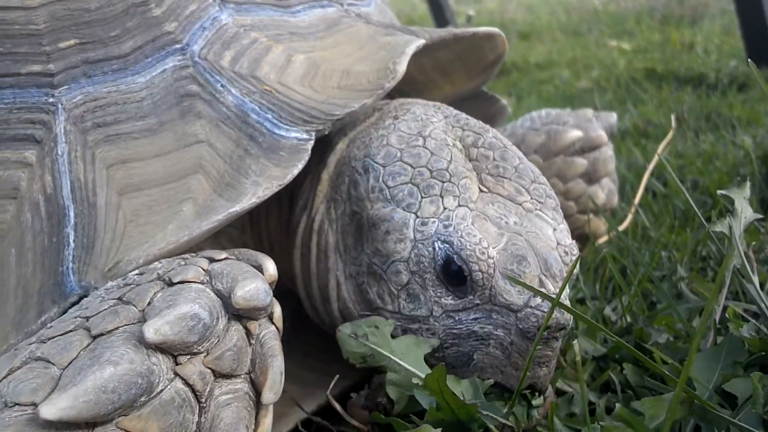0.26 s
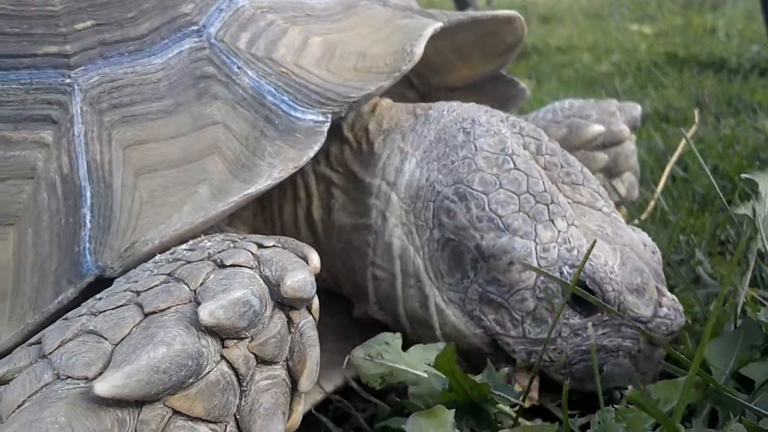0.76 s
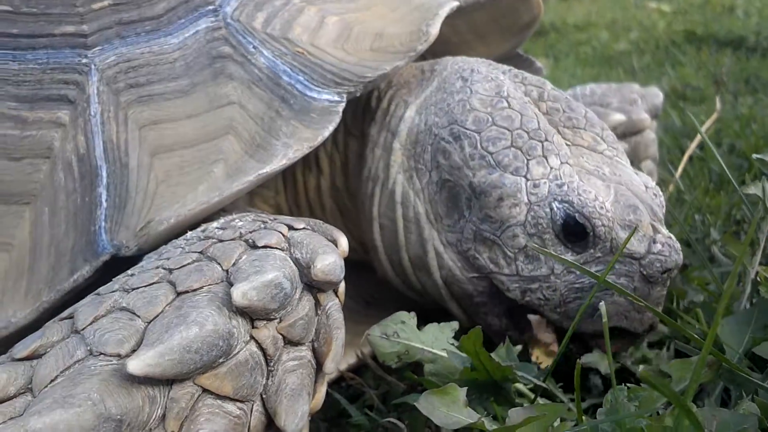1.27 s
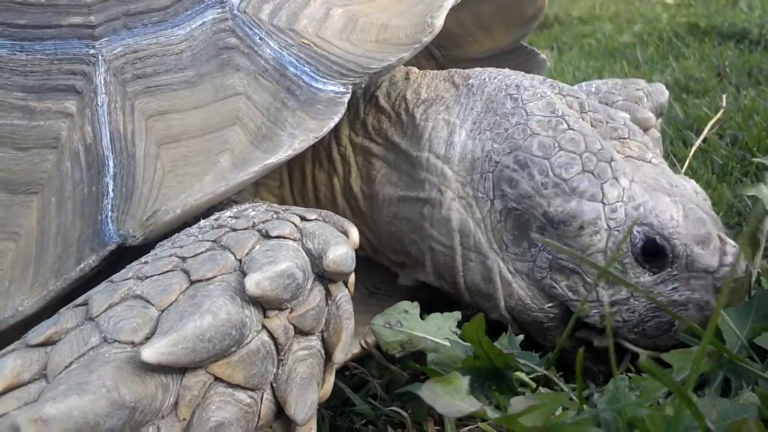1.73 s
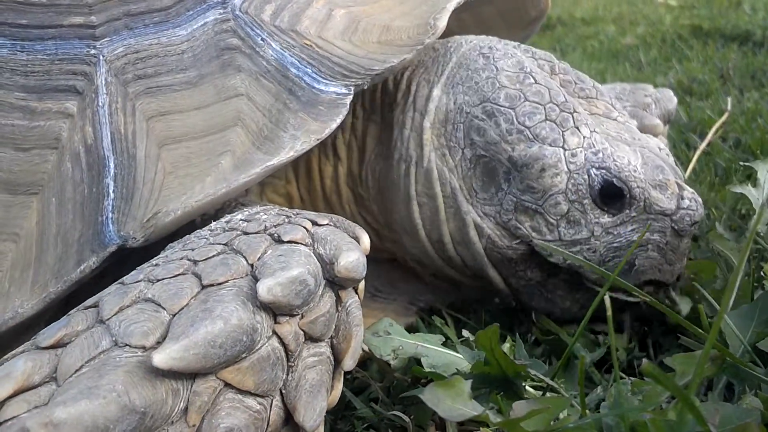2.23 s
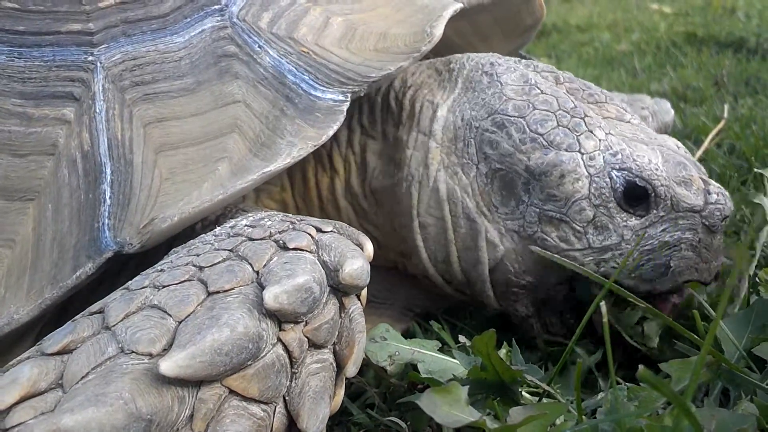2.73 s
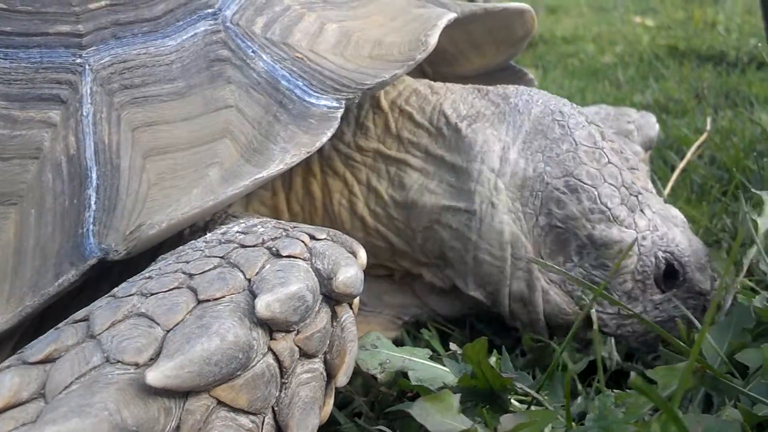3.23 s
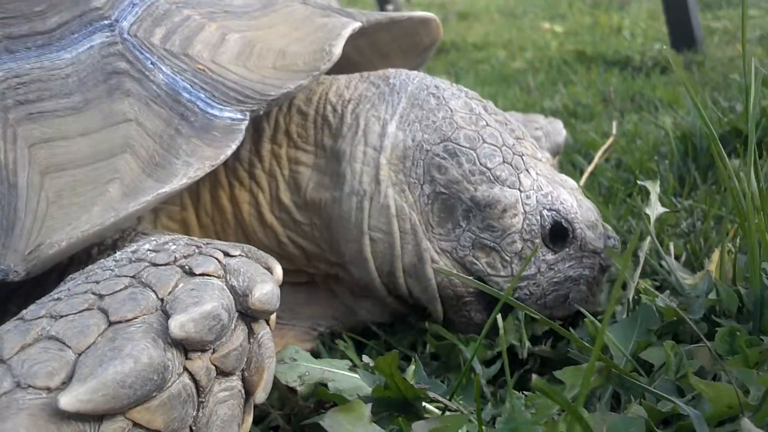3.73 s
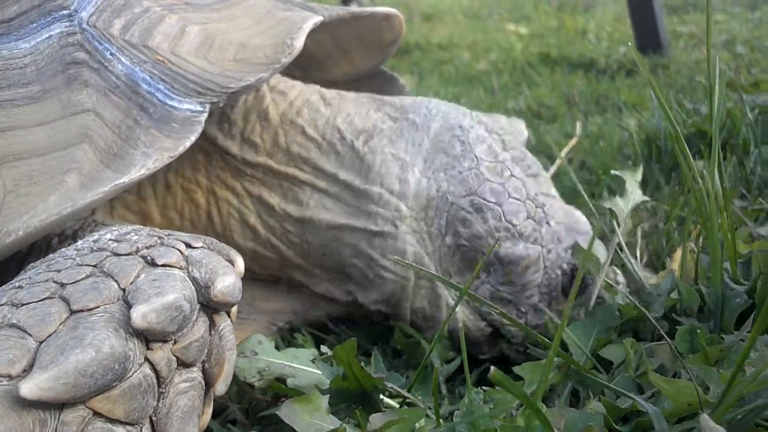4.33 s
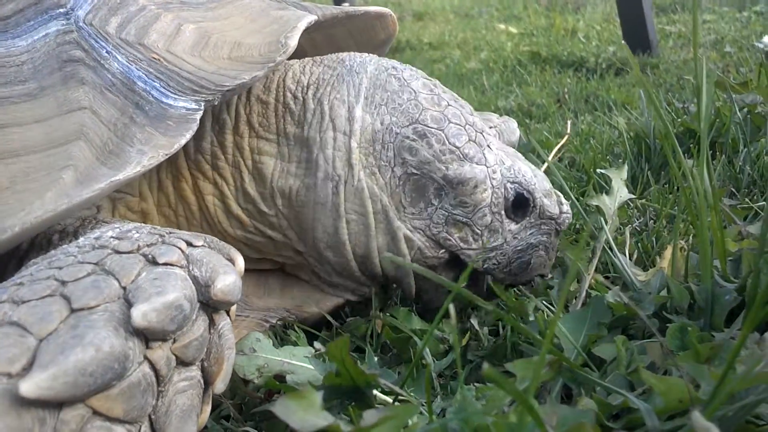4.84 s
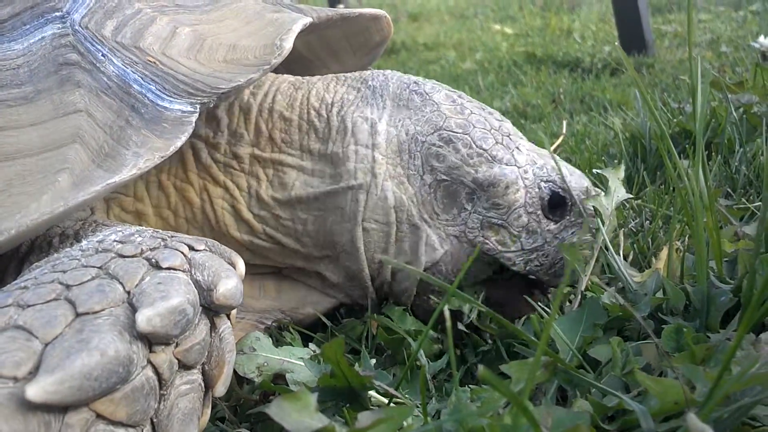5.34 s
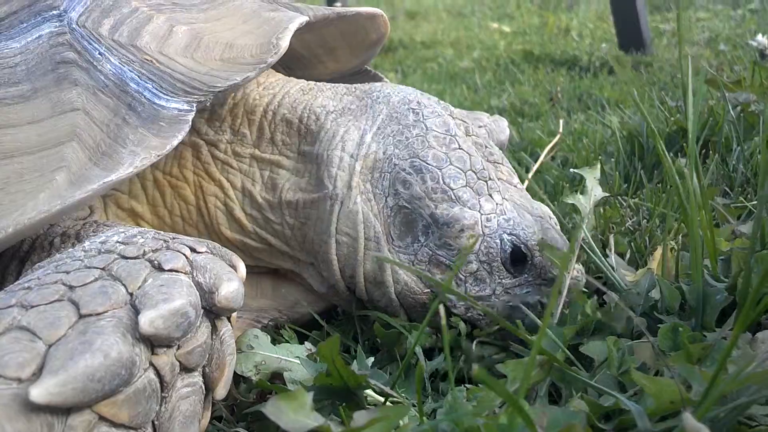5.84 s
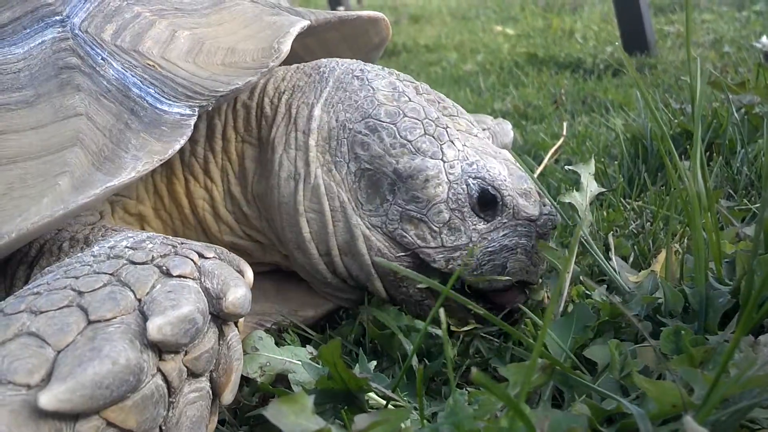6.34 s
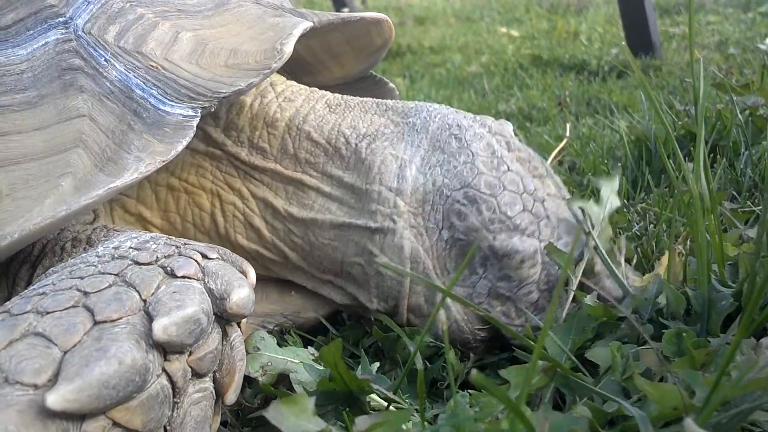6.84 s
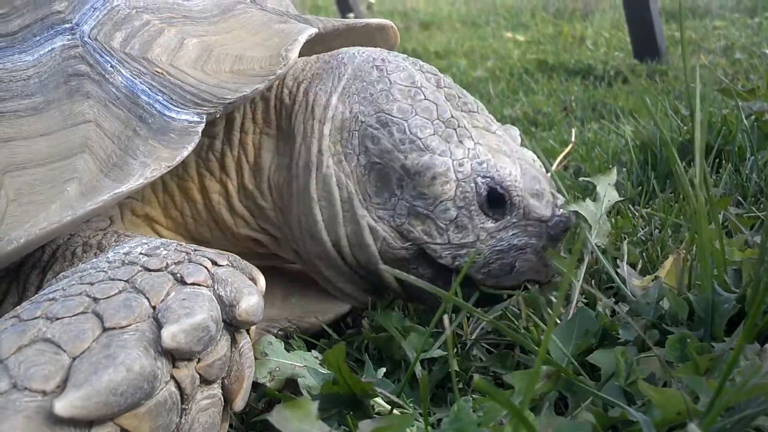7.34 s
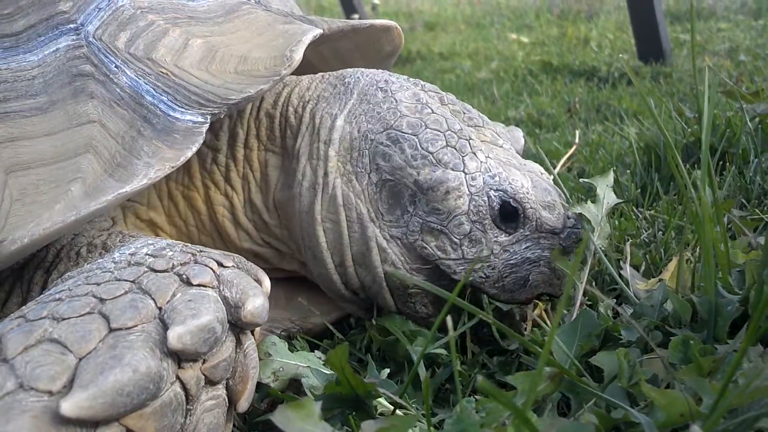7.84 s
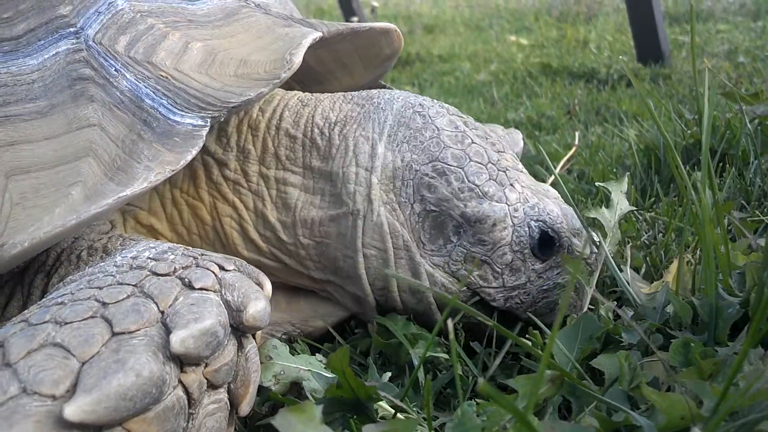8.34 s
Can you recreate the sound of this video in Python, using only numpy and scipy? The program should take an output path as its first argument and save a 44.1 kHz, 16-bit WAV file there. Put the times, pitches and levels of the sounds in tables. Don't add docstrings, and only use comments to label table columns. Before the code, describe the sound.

Close on a lawn, a tortoise bites leafy weeds: small bumps and rustles first, then bursts of sharp snaps, ticking veins and tearing leaves with quiet gaps between. Some gardens away a dog gives short, hoarse, high yelps that slap back off house walls. Far traffic drones softly underneath with faint hiss. A small stereo camera microphone sits beside the animal, the bites slightly right.

```python
import sys
import numpy as np
from scipy import signal
from scipy.fft import rfft, irfft, next_fast_len
from scipy.io import wavfile
from scipy.ndimage import uniform_filter1d, map_coordinates

SR = 44100
rng = np.random.default_rng(int(sys.argv[2]) if len(sys.argv) > 2 else 0)


def voltage_ratio(decibels):
    exponent = np.asarray(decibels, float) / 20
    return 10 ** exponent


def to_wav(sig):
    pcm = np.clip(np.atleast_2d(sig), -1, 1) * 32767
    pcm = np.round(pcm).astype(np.int16)
    wavfile.write(sys.argv[1], SR, pcm.T)


N = 378963


def unit(x):
    return x / np.sqrt(np.mean(x ** 2) + 1e-20)


def along(points, hz):
    f, v = np.transpose(points)
    return np.interp(np.log(hz + 1), np.log(f + 1), v)


def curves(rows):
    s, *cols = np.transpose(rows)
    return [np.interp(np.arange(N) / SR, s, c) for c in cols]


def wobble(rate, count=N):
    knots = rng.standard_normal(int(count * rate / SR) + 4)
    return map_coordinates(knots, [np.arange(count) * rate / SR])


def filtered(x, response):
    m = next_fast_len(N + 8192)
    return irfft(rfft(x, m) * response(np.fft.rfftfreq(m, 1 / SR)), m)[..., :N]


def band(x, low_hz, high_hz):
    sos = signal.butter(2, [low_hz, min(high_hz, SR / 2.2)], "band", fs=SR, output="sos")
    return signal.sosfilt(sos, x)


def delayed(hz, delay_s):
    return np.exp(-2j * np.pi * hz * delay_s)


def rush(spectrum, alike):
    pair = rng.standard_normal((2, N))

    def response(hz):
        turn = np.arccos(np.clip(along(alike, hz), -1, 1)) / 2
        return voltage_ratio(along(spectrum, hz)) * [np.cos(turn), np.sin(turn)]

    mid, side = filtered(pair, response)
    return unit(np.array([mid + side, mid - side]))


def patchy(x, depth_db):
    z = signal.stft(x, nperseg=2048)[2]
    field = uniform_filter1d(rng.standard_normal(z.shape[1:]), size=4, axis=0)
    field = uniform_filter1d(field, size=4, axis=1)
    return unit(signal.istft(z * voltage_ratio(depth_db * unit(field)), nperseg=2048)[1][:, :N])


# hz, level_db (per Hz)
RUMBLE = [(25, -45), (45, -15.5), (70, -9), (120, 2), (220, 0), (400, -8), (800, -44.5)]
DRONE = [(100, -52), (250, -13), (500, 5), (900, -0.5), (1300, -10), (2000, -16), (3000, -17), (5000, -82),
         (9000, -122)]
HISS = [(1500, -20), (3000, -2), (6000, -3), (10000, 0), (13000, 0.5), (15500, 1)]
# hz, likeness (0-1)
TOWN_ALIKE = [(60, 0.89), (200, 0.91), (600, 0.62), (1500, 0.0074), (4000, 0.011)]
# start_s, rumble_db, drone_db
TRAFFIC = [
    (0, -48, 2.1),
    (1.5, -51.5, -2),
    (4, -50, 0.35),
    (5.35, -52, 1.5),
    (6.5, -52.5, 1.9),
    (7.55, -52, -0.2),
    (7.9, -51, -0.5),
    (8.07, -47.5, 1),
    (8.2, -46, 2.5),
    (8.59, -49, -1.3),
]
# start_s, depth_db
DUCKS = [
    (2.0, 0.5),
    (3.37, 4.5),
    (4.52, 3),
    (5.93, 0.5),
    (7.2, 9.5),
]


def town():
    t = np.arange(N) / SR
    drop_s, recover_s = 0.012, 0.62
    gain_db = 0
    for s, depth_db in DUCKS:
        since = np.maximum(t - s, 0)
        gain_db = gain_db - depth_db * (1 - np.exp(-since / drop_s)) * np.exp(-since / recover_s)
    rumble_db, swell_db = curves(TRAFFIC)
    rumble = voltage_ratio(rumble_db + 8.5 + 0.5 * wobble(3.7)) * patchy(rush(RUMBLE, TOWN_ALIKE), depth_db=1)
    drone = voltage_ratio(swell_db - 45.5 + 1.1 * wobble(5)) * patchy(rush(DRONE, TOWN_ALIKE), depth_db=1.8)
    hiss = voltage_ratio(-56) * rush(HISS, [(1000, 0.017)])
    return voltage_ratio(gain_db) * (rumble + drone + hiss)


# delay_s, level_db
WALLS = [
    (.168, -5),
    (.205, -10.5),
    (.24, -27),
    (.29, -17),
]
# hz, level_db
WALL_TONE = [(300, -45), (600, -9), (1000, -8), (1300, -7), (1500, 6), (1750, 5.5), (3000, -1)]


def far_wall(x):
    def response(hz):
        slaps = sum(voltage_ratio(db) * delayed(hz, s) for s, db in WALLS)
        return voltage_ratio(along(WALL_TONE, hz)) * slaps

    return filtered(x, response)


def beside(x, left_db, lag_s):
    return np.array([voltage_ratio(left_db) * filtered(x, lambda hz: delayed(hz, lag_s)), x])


# hz, t60_s
YARD = [(300, 0.12), (1000, 0.51), (1600, 0.88), (4000, 0.32)]


def yard(x):
    hz, t, z = signal.stft(rng.standard_normal((2, SR)), SR, nperseg=256)
    tail = signal.istft(z * voltage_ratio(-60 * t / along(YARD, hz)[:, None]), SR, nperseg=256)[1]
    tail = tail + 0.3 * tail[::-1]
    late = np.pad(x, (700, 0))[None]
    return signal.fftconvolve(late, tail / np.linalg.norm(tail[0]), axes=1)[:, :N]


# start_s, length_s, pitch_hz (top), scoop (share below, 0-1), level_db
YELPS = [
    (0.923, .13, 550.5, 0.27, -36),
    (2.351, 0.14, 539, 0.24, -36.5),
    (3.822, 0.13, 532.7, 0.2, -33),
    (4.681, 0.12, 541.3, 0.19, -38),
    (5.553, 0.14, 525.7, 0.19, -29.5),
    (6.911, 0.092, 517, 0.15, -33.5),
    (7.372, 0.0945, 495, .1, -42.5),
    (7.624, 0.13, 527.6, 0.2, -30.5),
    (7.9, 0.079, 490, 0.18, -27),
    (8.254, 0.084, 478.5, .12, -25),
]
# breath_db, second_db, third_db, upper_db (fourth and above), doubling (0-1)
VOICES = [(-12.5, -2.5, -14.5, 3.5, 0.54), (-9, -7, -12.5, -16.5, 0.07), (-9, -4, -22, -2, 0.2),
          (-6, -4, -27, -5, 0), (-16, -18.5, -39, 3, 0.19), (-7, -3, -35, -22, 0.24),
          (-10, -4, -13, -21, 0.2), (-15, -10.5, -43, -35.5, 0.12), (-14, -16.5, -22, -34, 0),
          (-16.5, -9.5, -35, -40, 0.05)]
# yard_db, far_wall_db, left_over_right_db (direct sound)
AIMS = [(1.5, -13.5, 3.5), (1, -10.5, 6), (-3, -8, -9), (-4.5, 0, 4.5), (0.5, 1.5, 4.5), (-6, -12, 4),
        (-4, -19, -2.5), (-10.5, -15, -4), (-4.5, -10, -4.5), (-7.5, -13, -3.5)]
# peak_at (share of length), start_db, fall_db (after peak), top_partials_db (5th, 6th)
SWELLS = [(.4, -10, -7, -14), (.72, -5, -4, 12), (.3, -5, -3, -6), (.7, -5, -2, -6), (.3, -10, -5, -6),
          (.2, -6, -3, -6), (.45, -6, -3, -6), (.33, -7, -5, -6), (.36, -9, -5, -6), (.15, -5, -1, -6)]
# shake (share), glide_s (closing the scoop), sag (share lost at the end)
SHAKES = [(0.036, 0.032, 0.0495), (0.013, 0.016, 0.113), (0.025, .015, .08), (.02, 0.01435, 0.116),
          (0.029, 0.0157, 0.116), (0.028, 0.0106, 0.118), (0.018, 0.0089, .12), (0.014, 0.0137, 0.125),
          (0.021, 0.0236, 0.056), (0.018, 0.0191, 0.074)]
# hz, level_db (per Hz)
THROAT = [(300, 12), (500, 24), (700, -43), (880, 21.5), (1050, 13), (1250, -61), (1450, -71), (2100, 2.5),
          (3200, -23)]
# hz, level_db
MOUTH = [(760, 19.5), (880, 4.5), (960, 1), (1050, 0.5), (1150, -7)]
# partial (number), level_db
UPPER = [(5, 1), (6, -9)]


def dog():
    out = np.zeros((4, N))
    breath = unit(filtered(rng.standard_normal(N), lambda hz: voltage_ratio(along(THROAT, hz))))
    t = np.arange(N) / SR

    def rough(count):
        fast, slow = wobble(130, count=SR // 4), wobble(30, count=SR // 4)
        return voltage_ratio(2.8 * fast + .8 * slow)[:count]

    for yelp, voicing, aim, swell, movement in zip(YELPS, VOICES, AIMS, SWELLS, SHAKES):
        s, length, top_hz, scoop, db = yelp
        breath_db, second_db, third_db, upper_db, doubling = voicing
        yard_db, wall_db, left_db = aim
        peak_at, start_db, fall_db, top_partials_db = swell
        shake, glide, sag = movement

        gate = np.clip((t - s) / 0.008, 0, 1) * np.clip((s + length - t) / 0.004 + 1, 0, 1)
        on = gate > 0
        u = (t[on] - s) / length
        under = scoop * np.exp(-((t[on] - s) / glide) ** 2 / 2)
        pitch = top_hz * (1 - under - sag * u ** 4)
        level_db = db - 11.5 * under + np.interp(u, [0.6, 1], [0, -2])
        level_db += np.interp(u, [0, np.clip(peak_at, .05, .95), 1], [start_db, 0, fall_db])

        shaken = pitch * (1 + shake * wobble(120, count=SR // 4)[:len(u)])
        turn = 2 * np.pi * np.cumsum(shaken) / SR
        voice = rough(len(u)) * np.sin(turn)
        voice += voltage_ratio(second_db + along(MOUTH, 2 * pitch)) * rough(len(u)) * np.sin(2 * turn)
        top = sum(voltage_ratio(partial_db + top_partials_db) * np.sin(k * turn) for k, partial_db in UPPER)
        upper = np.sin(3 * turn) + voltage_ratio(upper_db) * (np.sin(4 * turn) + top)
        voice += voltage_ratio(third_db) * rough(len(u)) * upper
        voice += voltage_ratio(breath_db) * breath[on] * (1 + np.sin(turn))
        voice *= 1 + doubling * np.sin(turn / 2)
        out[:, on] += voltage_ratio([[0], [left_db], [yard_db], [wall_db]]) * voltage_ratio(level_db) * gate[on] * voice
    return band(out, low_hz=200, high_hz=9000)


# start_s, level_db (peak)
KNOCKS = [(0.008, -28.0), (0.041, -30.0), (0.056, -33.0), (0.068, -31.0), (0.082, -30.0), (0.097, -34.0),
          (0.119, -34.0), (0.197, -31.0), (0.23, -30.0), (0.423, -31.0), (0.543, -30.0), (0.555, -32.0),
          (0.566, -31.0), (0.616, -34.0), (0.631, -27.0), (0.724, -35.0), (0.736, -32.0), (0.752, -29.0),
          (0.832, -31.0), (0.893, -34.0), (1.083, -32.0), (1.112, -27.0), (3.01, -35.0), (3.075, -31.0),
          (3.093, -34.0), (3.21, -32.0), (3.33, -34.0), (3.783, -32.0), (6.133, -36.0), (6.341, -33.0)]


def knocks():
    t = np.arange(1500) / SR
    out = np.zeros(N + len(t))
    for s, db in KNOCKS:
        rock = np.sin(2 * np.pi * rng.uniform(150, 330) * t)
        rock += 1.2 * band(rng.standard_normal(len(t)), 200, 900)
        out[round(s * SR):][:len(t)] += voltage_ratio(db + 2 - 60 * t / .035) * (1 - np.exp(-t / .001)) * rock
    return band(out[:N], 90, 2500) * [[1], [-.75]]


def round_case(pair):
    def to_left(hz):
        long = 1 / (1 + (hz / 5600) ** 6)
        return voltage_ratio(-8) * long + voltage_ratio(-6) * (1 - long) * delayed(hz, .00047)

    return np.array([filtered(pair[0], to_left), pair[1]])


# peak_s, rise_s, fall_s, level_db (rise and fall span 20 dB)
DRAGS = [(.059, 0.083, 0.16, -44), (.225, 0.045, 0.044, -47), (.422, 0.11, 0.088, -43.5),
         (.631, 0.2, 0.34, -38), (.874, .3, 0.14, -49.5), (1.181, 0.71, 0.26, -50.5),
         (1.529, .07, 0.14, -46), (1.699, 0.093, 0.38, -42), (1.87, 0.12, 0.17, -38),
         (1.987, .1, 0.082, -42.5), (2.149, 0.097, 0.042, -50), (2.36, 0.4, 0.12, -57.5),
         (2.741, 0.061, 0.078, -48.5), (2.9, 0.77, 0.27, -54.5), (3.001, 0.12, 0.98, -42.5),
         (3.211, 0.15, 0.13, -51), (3.345, 0.037, 0.052, -32), (3.84, 0.2, 0.18, -65),
         (4.023, 0.09, 0.2, -52), (4.303, 0.24, 0.23, -46.5), (4.497, 0.1, 0.15, -40),
         (4.874, 0.069, 0.51, -56), (5.558, 0.2, 0.4, -45), (5.758, 0.034, 0.15, -46),
         (5.841, 0.014, 0.052, -33), (5.922, 0.13, 0.13, -42.5), (7.031, 0.64, 0.25, -44.5),
         (7.115, 0.068, 0.052, -38.5), (7.202, 0.14, 0.031, -45), (8.049, 0.14, 0.14, -48.5)]


def drag():
    t = np.arange(0, N / SR, .002)
    power = voltage_ratio(-92) ** 2
    for s, rise, fall, db in DRAGS:
        span = np.where(t < s, max(rise, .01), max(fall, .01))
        power = power + voltage_ratio(db - 20 * np.abs(t - s) / span) ** 2
    return np.interp(np.arange(N) / SR, t, np.sqrt(power))


# hz, level_db (per Hz)
LEAF = [(300, -5), (900, -1), (2300, 9.5), (3000, 0.5), (4000, 6), (5200, 8), (9000, 6.5), (15500, -2)]


def rustle():
    struck = rng.random(N) < 900 / SR * voltage_ratio(6 * wobble(70))
    size = voltage_ratio(4.5 * np.minimum(rng.exponential(1, N), 2.1))
    cracks = struck * size * rng.standard_normal(N)
    crack = voltage_ratio(-60 * np.arange(300) / SR / .004) * rng.standard_normal(300)
    grains = unit(signal.fftconvolve(cracks, crack)[:N]) + .35 * rng.standard_normal(N)
    near = unit(filtered(grains, lambda hz: voltage_ratio(along(LEAF, hz))))
    near = round_case([near, near])
    return voltage_ratio(-3) * drag() * (near + 0.67 * rush(LEAF, [(1000, 0.17)]))


# start_s, level_db
SLIDE = [
    (3.572, -72),
    (3.578, -43.5),
    (3.62, -41.5),
    (3.668, -43),
    (3.678, -74),
]
# hz, level_db (per Hz)
BLADE = [(1500, -14.5), (3500, -12.5), (6000, -6), (7600, 2.5), (9500, -11), (15500, -15)]


def slide():
    level_db, = curves(SLIDE)
    return voltage_ratio(level_db + [[2.5], [-5]]) * (level_db > -69) * rush(BLADE, [(1000, .1)])


# start_s, level_db, brightness_db, thickness_db
SNAPS = [(.0544, -50, -3, 11.5), (.404, -45.5, 4, 10), (.8665, -43, 25, 8), (1.7776, -29.5, 0, -25),
         (1.902, -39, 20.5, 1), (1.9578, -22, -6, -22), (1.9973, -28, -2, -11), (3.211, -22, 0.5, -27),
         (3.2277, -37, 10, 2.5), (3.3084, -29, 6.5, -2.5), (3.3346, -23.5, -2, -9.5),
         (3.3437, -27.5, 6.5, -12), (3.694, -71, 10, 34.5), (3.7252, -62, 2, 28), (3.741, -59, -12, 23),
         (3.7714, -45, 11, 9), (4.4542, -27.5, 0, -6), (4.4864, -30, -9, -1.5), (4.5034, -25, -2, -5),
         (4.5081, -25.5, 0.5, -1), (5.7591, -44.5, 15.5, 7), (5.842, -37.5, 14.5, 10.5),
         (5.9015, -41, 18, 8), (6.9687, -32, -13, -13), (7.0838, -37, -12, 0), (7.097, -34.5, 10, 11),
         (7.1051, -28, -10, 1.5), (7.113, -39.5, 15, 8), (7.1835, -24.5, 9, -4), (7.2263, -28, 3.5, -7),
         (7.8095, -63, 24, -8), (1.3365, -51, 21, -13), (4.0068, -49, 19.5, -5), (5.211, -61, 24, -5)]
# start_s, level_db
TEARS = [(.0655, -41), (.234, -37), (.317, -39), (.544, -37.5), (.8148, -40), (1.741, -35), (1.8517, -33),
         (1.929, -34), (1.975, -32), (3.1505, -32), (3.2163, -32), (3.2775, -38), (3.358, -36),
         (3.4127, -36), (3.5729, -35.5), (3.808, -41), (3.8463, -36.5), (4.481, -59), (4.5634, -40),
         (4.6, -35.5), (4.6518, -39), (5.7959, -38), (5.818, -32.5), (5.8733, -33), (5.911, -35),
         (6.0095, -38), (6.9968, -31.5), (7.0416, -36), (7.131, -37), (7.1526, -37)]
# start_s, level_db
VEINS = [(.639, -43), (.7025, -51), (.7102, -46), (.7741, -46), (1.7978, -42), (1.8353, -49), (1.859, -38),
         (1.8734, -52), (2.0306, -45.5), (3.0165, -55), (3.0979, -46), (3.1302, -38.5), (3.1667, -36),
         (3.3173, -39), (3.3647, -34.5), (3.3798, -30.5), (3.7832, -50), (3.858, -50), (3.881, -44),
         (4.533, -32.5), (5.5487, -49), (5.8503, -35), (5.8957, -34), (5.939, -38.5), (6.922, -38.5),
         (7.0246, -37), (7.0589, -32)]
# start_s, level_db
SHREDS = [(.5977, -52), (1.823, -43), (1.9515, -53), (3.2209, -33.5), (3.458, -41.5), (3.517, -70.5),
          (3.6612, -60), (3.796, -43), (3.825, -48), (3.84, -49), (3.952, -62), (3.971, -44), (4.4621, -43),
          (4.4947, -36), (4.615, -44), (4.6574, -35.5), (5.7395, -43), (5.829, -43), (7.017, -51),
          (7.036, -32.5), (1.083, -50), (2.072, -51), (2.131, -43.5), (1.196, -46), (1.385, -49)]
# start_s, peak_db (level is taken 9 dB below)
MORE_SHREDS = [(0.041, -41), (0.1955, -39), (0.2046, -34), (0.413, -38), (2.289, -40), (2.3287, -36),
               (2.369, -37), (2.572, -43), (2.648, -47), (2.7243, -39.5), (2.903, -38), (2.9754, -33),
               (3.1926, -42), (3.2081, -26), (3.2464, -38), (3.689, -43), (3.9614, -44), (3.9854, -42),
               (4.451, -28), (4.481, -21), (4.524, -33), (4.537, -26), (4.5926, -40), (4.67, -35), (4.8726, -43),
               (7.1914, -44), (7.2003, -43), (7.6004, -57), (7.7463, -56), (7.8684, -42), (7.879, -39),
               (7.9984, -46), (8.04, -53), (8.064, -40), (0.752, -38), (3.4, -33), (3.861, -43), (3.877, -43),
               (4.518, -38), (4.61, -36), (4.854, -46), (5.773, -34), (5.824, -29), (5.8402, -20), (5.855, -33),
               (5.861, -41), (5.871, -35), (5.936, -36), (5.961, -41), (5.993, -43), (6.298, -51), (7.004, -40),
               (7.1, -20.5)]


def breaks():
    crumbs = [(s, peak_db - 9) for s, peak_db in MORE_SHREDS]
    groups = ((TEARS, 2, -5), (VEINS, 9, -3), (SHREDS, 5, -1), (crumbs, 5, -1))
    found = list(SNAPS)
    for rows, bright_db, thick_db in groups:
        for s, db in rows:
            scatter = 1.5 * rng.standard_normal(2)
            found.append((s, db, bright_db + scatter[0], thick_db + scatter[1]))
    return found


def loudest(x):
    return x / np.sqrt(np.abs(uniform_filter1d(x ** 2, size=88)).max(axis=1, keepdims=True))


def snaps():
    t = np.arange(700) / SR
    s, db, bright_db, thick_db = np.transpose(breaks())[..., None]
    noise = rng.standard_normal((len(s), len(t)))
    uneven = np.repeat(rng.standard_normal((len(s), 25)), 28, axis=1)
    fibres = voltage_ratio(-60 * t / .012) * voltage_ratio(4 * uneven)
    burst = (voltage_ratio(-60 * t / .0012) + .45 * fibres) * (noise + 2.5 * (t == 0))

    knock = band(band(burst, low_hz=450, high_hz=2600), low_hz=400, high_hz=3000)
    body = band(band(burst, low_hz=3670, high_hz=8460), low_hz=3180, high_hz=14200)
    edge = band(burst, low_hz=6560, high_hz=10920)
    air = band(burst, low_hz=9100, high_hz=14250)
    bright = 0.99 * loudest(edge) + 0.52 * loudest(air)
    snap = voltage_ratio(thick_db + 1.0) * loudest(knock) + loudest(body) + voltage_ratio(bright_db) * bright
    snap = voltage_ratio(db - 2.0) * snap

    left_gain = voltage_ratio(2.5 * rng.standard_normal((len(s), 1)))
    left_lag = np.round(.7 * rng.standard_normal((len(s), 1)))
    at = (np.round(s * SR) + np.arange(len(t))).astype(int)
    pair = []
    for gain, lag in ((left_gain, left_lag), (1, 0)):
        place = (at + lag).astype(int).ravel()
        pair.append(np.bincount(place, (gain * snap).ravel(), N)[:N])
    return round_case(pair)


def scene():
    call, call_left, to_yard, to_wall = dog()
    slap = far_wall(to_wall)
    direct = np.array([call_left, call])
    echoes = beside(1.3 * slap, left_db=10.0, lag_s=0.0003) + yard(to_yard + slap)
    return town() + direct + echoes + knocks() + rustle() + slide() + snaps()


def top_cut(x):
    return signal.sosfilt(signal.butter(12, 16640, fs=SR, output="sos"), x)


# hz, share (fed to the other side)
CROSS = [(100, .75), (1200, .6), (2500, .97), (5000, .76), (6100, .15), (8700, .45), (11500, .2),
         (15000, .1)]
# hz, level_db
PORT = [(1800, -1.5), (2300, -3.5), (2900, -4.5), (3800, 2), (4300, -3.5), (4900, 2.5), (5900, -4.5),
        (7000, -1.5)]


def record(dry):
    cross = filtered(dry[::-1], lambda hz: np.clip(along(CROSS, hz), 0, 1) * delayed(hz, .000405))

    def port(hz):
        top = np.where(hz < 15800, 1, voltage_ratio(-60))
        return top * voltage_ratio(along(PORT, hz))

    return top_cut(filtered(dry - cross, port))


dry = scene()
out = record(dry)
to_wav(out)
```